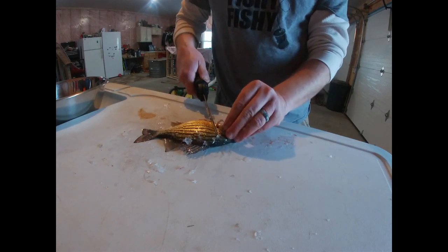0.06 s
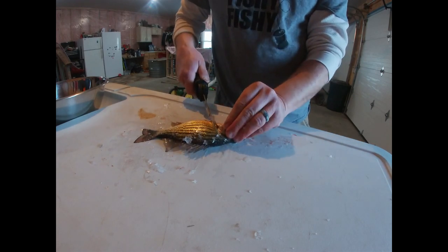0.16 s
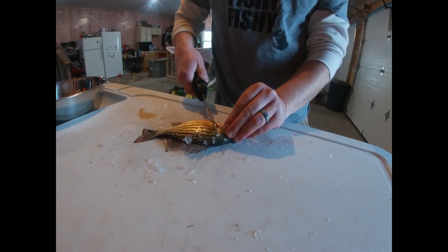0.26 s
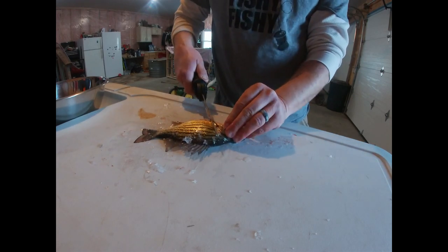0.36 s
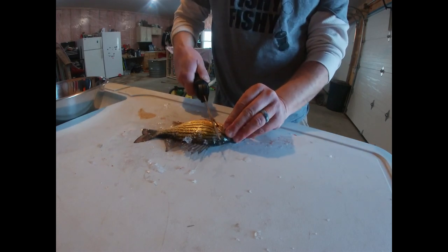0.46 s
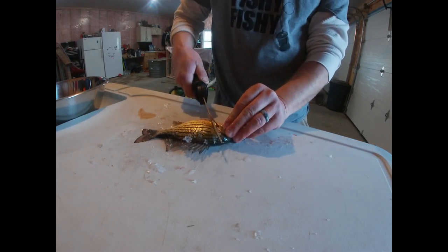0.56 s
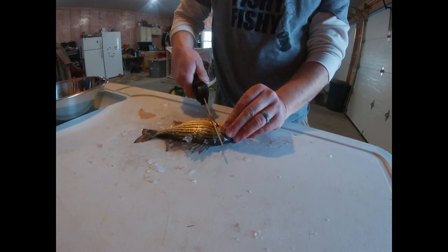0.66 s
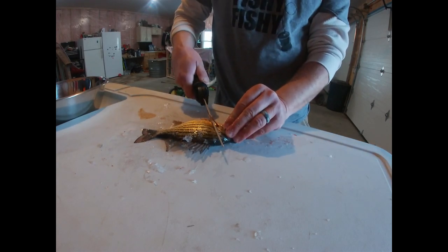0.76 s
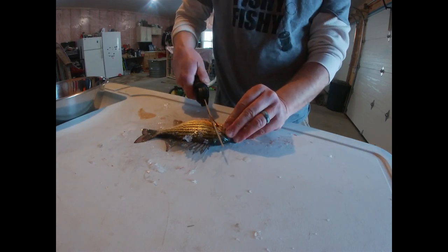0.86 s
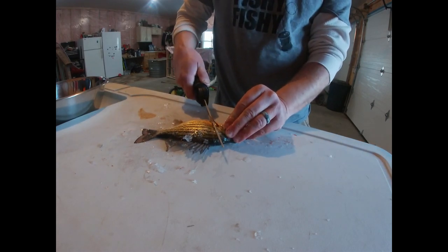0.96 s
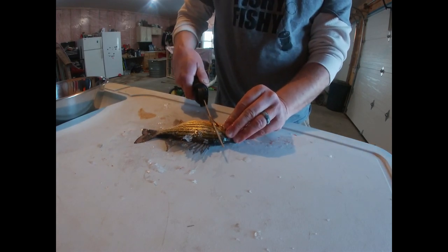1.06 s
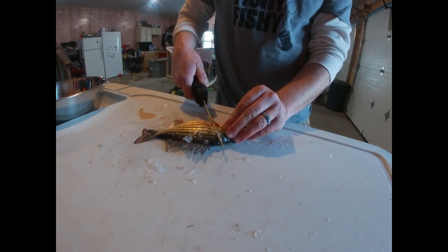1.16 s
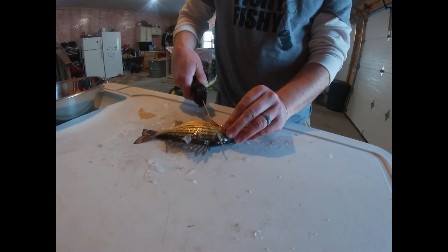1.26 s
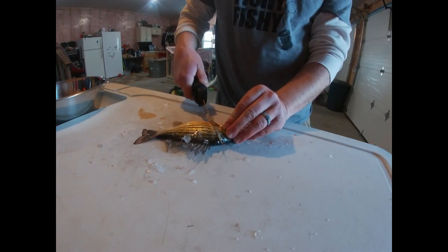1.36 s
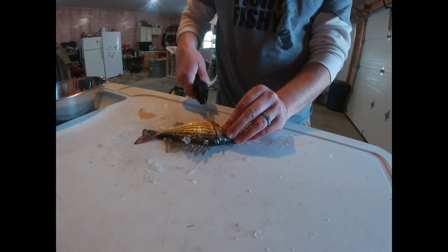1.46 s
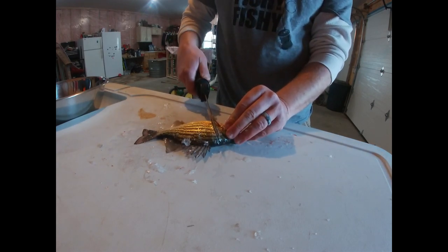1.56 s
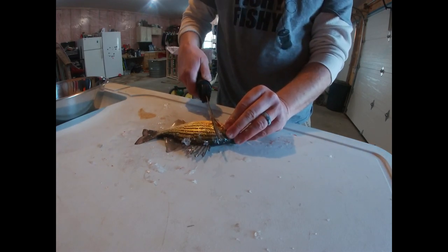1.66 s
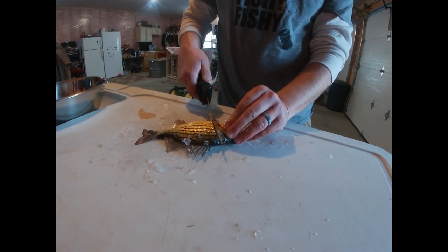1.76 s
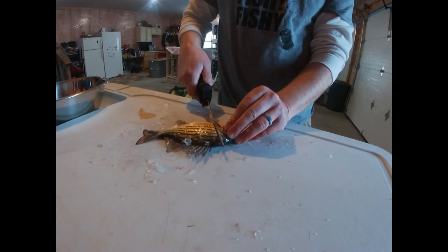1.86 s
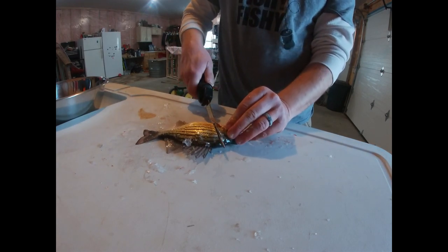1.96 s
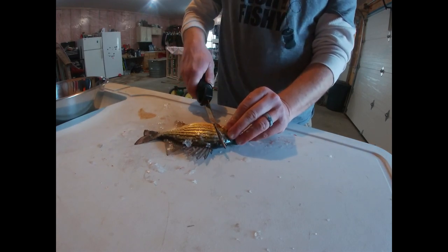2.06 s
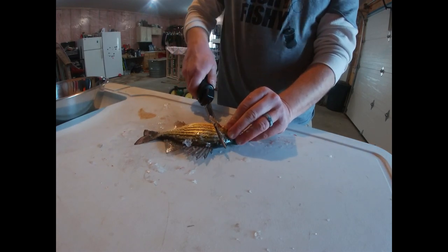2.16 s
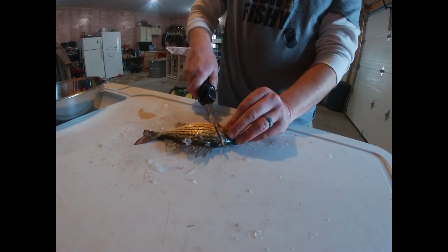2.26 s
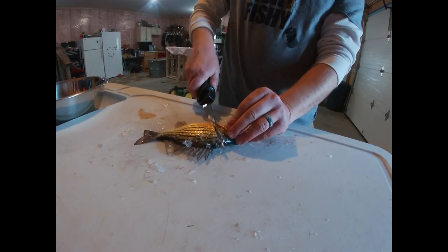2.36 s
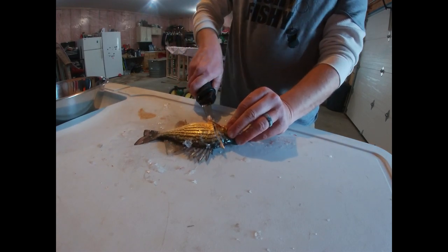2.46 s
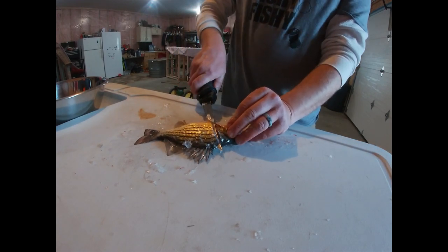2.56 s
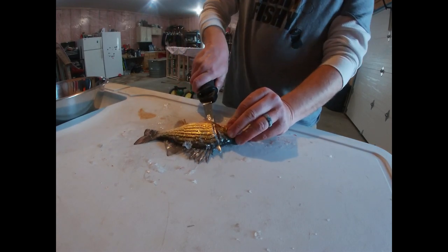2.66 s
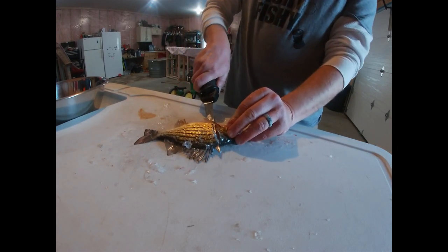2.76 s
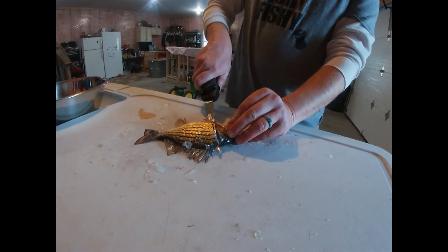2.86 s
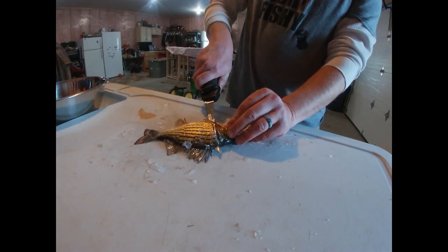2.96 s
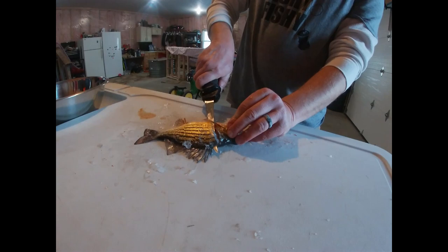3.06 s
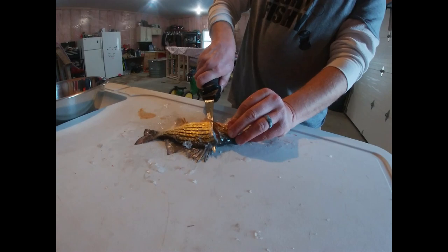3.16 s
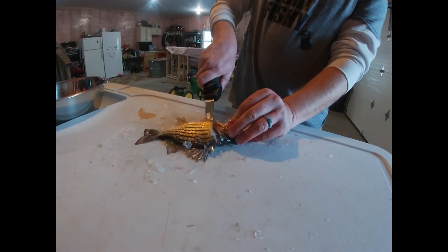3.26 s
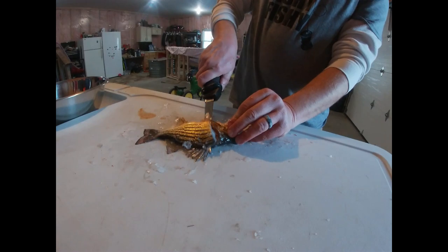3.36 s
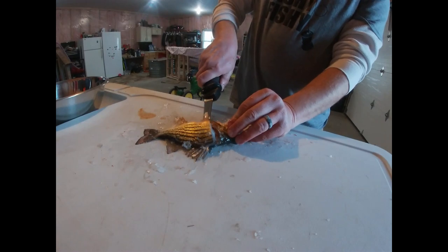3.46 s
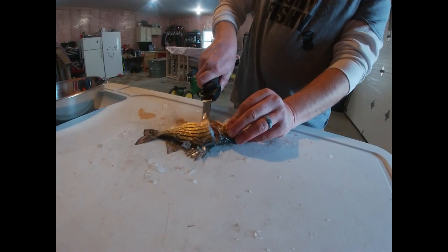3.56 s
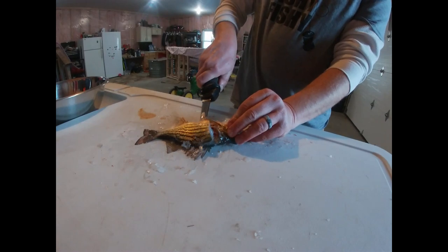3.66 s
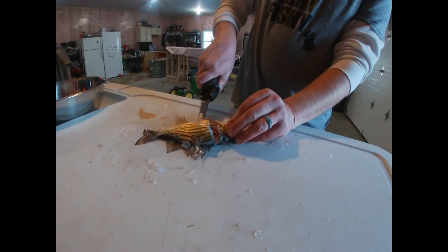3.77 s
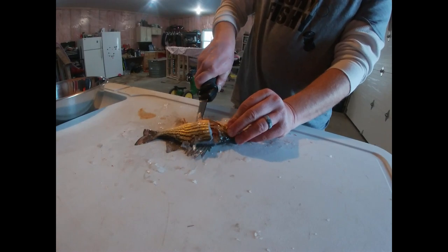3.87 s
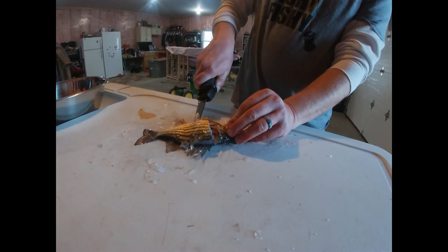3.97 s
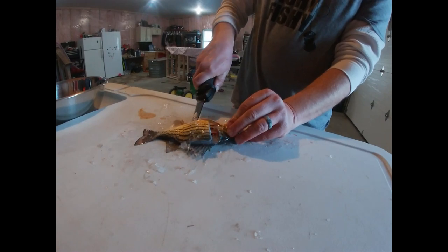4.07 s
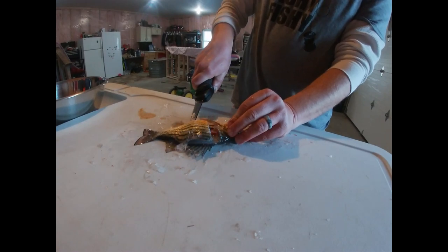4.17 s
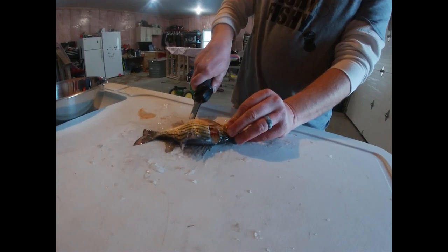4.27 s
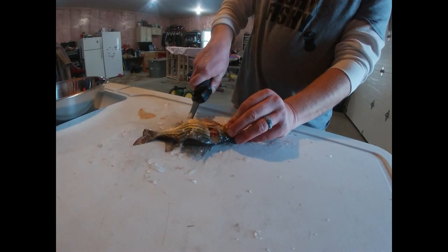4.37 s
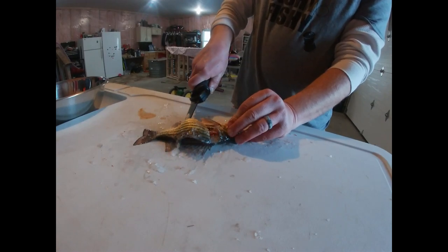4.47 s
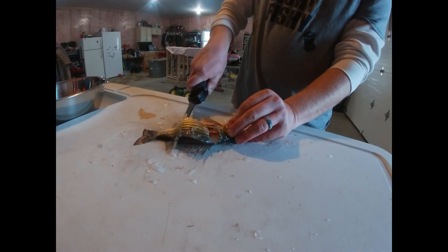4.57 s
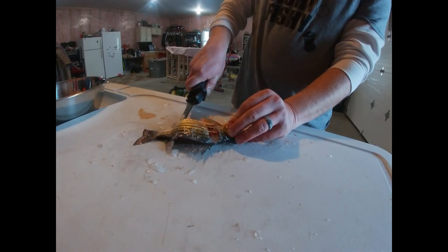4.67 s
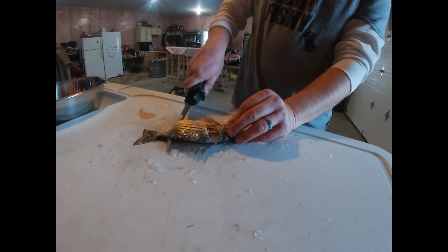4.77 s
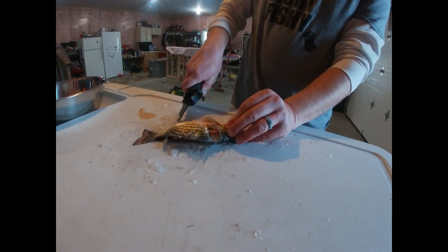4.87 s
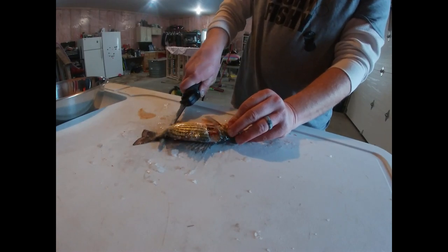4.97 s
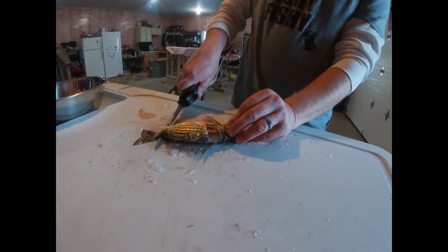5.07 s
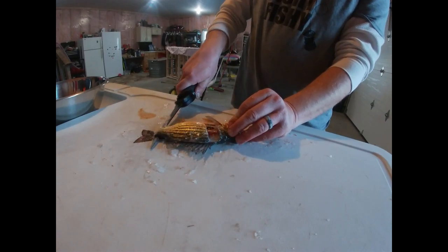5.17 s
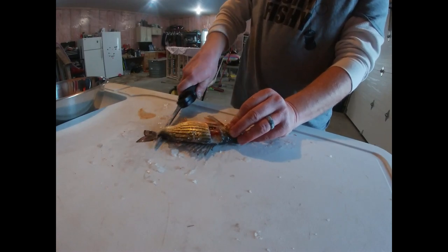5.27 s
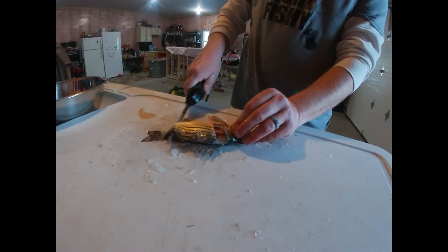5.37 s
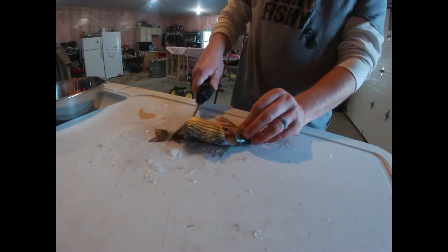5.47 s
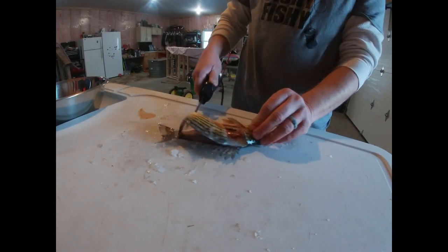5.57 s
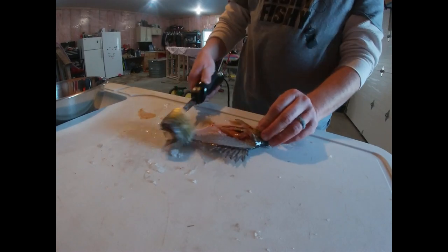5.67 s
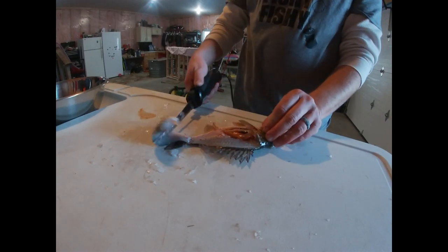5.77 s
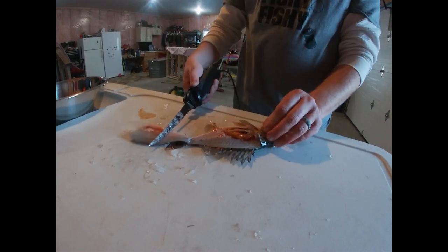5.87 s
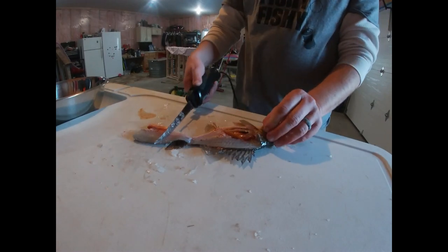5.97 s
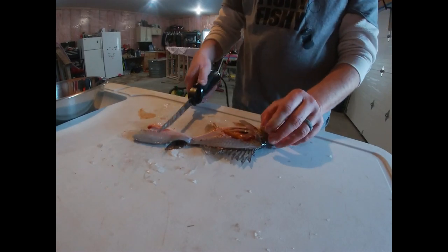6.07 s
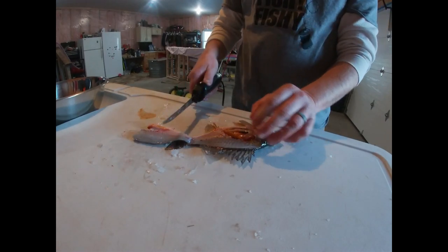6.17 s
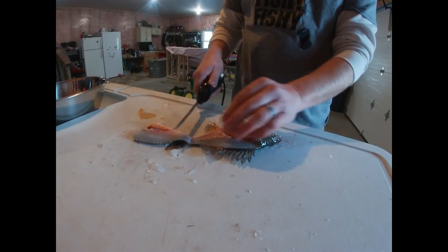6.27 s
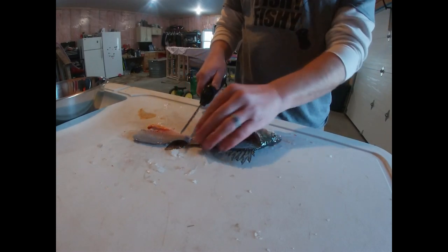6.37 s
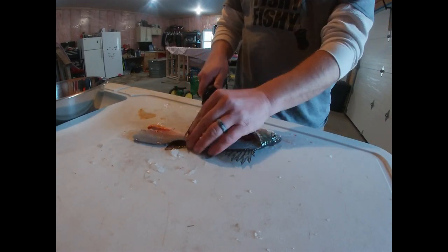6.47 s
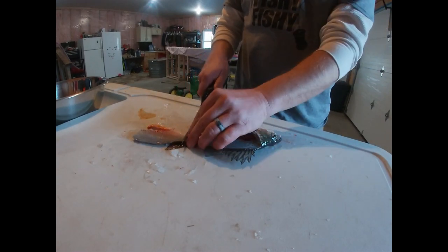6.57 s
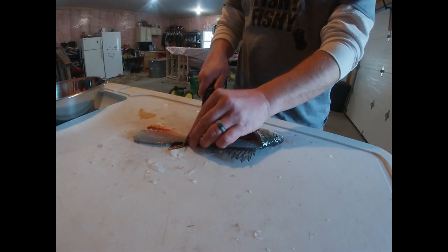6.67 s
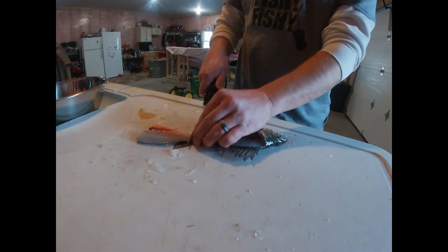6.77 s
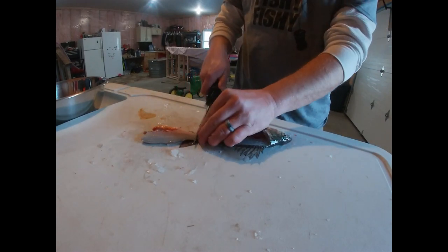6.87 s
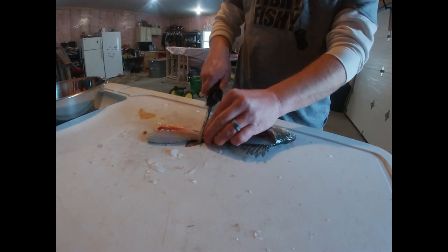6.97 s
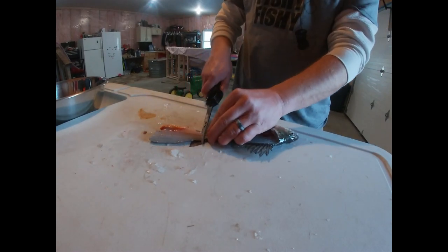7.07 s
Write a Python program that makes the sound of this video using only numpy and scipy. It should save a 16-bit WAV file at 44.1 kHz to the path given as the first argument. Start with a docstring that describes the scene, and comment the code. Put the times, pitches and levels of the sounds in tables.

```python
"""In a garage, with the microphone standing close by on a plastic table, an electric knife fillets a fish.
Over quiet background noise come a cut, a short touch and a long cut: a crank drives the blades to and fro,
they clack at every turn, scrape in between and shake the table top. After each of these three runs
the motor coasts down in single clacks. Then the fillet is flipped over with a crack and a thump, patted and
gripped, and a fourth run begins. Noise bursts make the clacks, multiples of the stroke the table drone."""
import sys
import numpy as np
from scipy import signal
from scipy.fft import rfft, irfft, next_fast_len
from scipy.io import wavfile
from scipy.ndimage import uniform_filter1d, map_coordinates

SR = 44100
rng = np.random.default_rng(int(sys.argv[2]) if len(sys.argv) > 2 else 0)


def unload_audio(sound):
    """Save the sound as a 16-bit wav file, at the path given as the first command line argument."""
    columns = np.transpose(np.atleast_2d(sound))
    # keep every value between -1 and 1, then stretch to whole-number steps
    steps = np.round(np.clip(columns, -1, 1) * 32767)
    wavfile.write(sys.argv[1], SR, steps.astype(np.int16))


N = 313992
TIME = np.arange(N) / SR  # seconds
# All levels in the tables are relative: the gains where the layers are mixed still apply.


def amp(db):
    """Decibels to gain."""
    return 10 ** (np.asarray(db) / 20)


def unit(x):
    """Scale to rms 1."""
    return x / np.sqrt(np.mean(x ** 2) + 1e-20)


def along(points, hz):
    """(Hz, value) points read on a log frequency axis."""
    f, v = np.transpose(points)
    return np.interp(np.log(hz + 1), np.log(f + 1), v)


def wobble(rate):
    """A smooth random curve with rate knots a second."""
    knots = rng.standard_normal(int(N * rate / SR) + 4)
    return map_coordinates(knots, [TIME * rate])


def filtered(x, response):
    """x times a complex response of frequency."""
    m = next_fast_len(N + SR // 2)
    hz = np.fft.rfftfreq(m, 1 / SR)
    return irfft(rfft(x, m) * response(hz), m)[..., :N]


def colour(x, spectrum, size=8192):
    """Causal (minimum-phase) filter of energy 1 with the given spectrum."""
    gain = amp(along(spectrum, np.fft.rfftfreq(size, 1 / SR)))
    cepstrum = irfft(np.log(gain + 1e-6))
    # folding the cepstrum forward in time makes the filter causal
    cepstrum[1:size // 2] *= 2
    cepstrum[size // 2 + 1:] = 0
    response = irfft(np.exp(rfft(cepstrum)))
    return signal.fftconvolve(x, response / np.linalg.norm(response))[:N]


def noise(spectrum):
    """Coloured noise of rms 1."""
    return unit(colour(rng.standard_normal(N), spectrum))


def spikes(times, sizes):
    """Impulses at the given times."""
    samples = np.clip(np.asarray(times) * SR, 0, N).astype(int)
    return np.bincount(samples, sizes, N + 1)[:N]


def bursts(times, sizes, rise, decay):
    """Envelope that jumps at each time and dies away; rise and decay in seconds."""
    t = TIME[:SR // 6]
    shape = np.exp(-t / decay) * (1 - np.exp(-t / rise))
    return np.abs(signal.fftconvolve(spikes(times, sizes), shape / shape.max())[:N])


def held(start, end, fade):
    """Gain that fades in at the start, holds, and fades out by the end."""
    return np.clip(np.minimum(TIME - start, end - TIME) / fade, 0, 1)


def level(curves):
    """Curves of (s, dB) as dB per sample, -100 dB outside them."""
    return np.max([np.interp(TIME, *np.transpose(rows), -100, -100) for rows in curves], axis=0)


# Quiet background noise. Each row: frequency in Hz, level in dB.
BACKGROUND_SPECTRUM = [(15, -24), (25, -11), (55, 1.5), (80, -16), (180, -4), (350, -19), (700, -30.5),
                       (1600, -29), (2300, -33.5), (4500, -34), (7000, -41), (9000, -53), (12000, -53),
                       (16000, -74)]


def background():
    """Steady coloured noise lies under the whole scene."""
    return amp(-54) * noise(BACKGROUND_SPECTRUM)


# Runs of the knife. Each row: trigger pressed in seconds, released in seconds, blades at rest in seconds,
# gear housing in dB, steel blades in dB, jolt of the turns in dB, sway of the table in dB,
# loss of the blades in dB per halving of the speed.
KNIFE_RUNS = [(.221, 1.55, 2.11, -28.5, -26, -21.5, -27.5, 7.5),
              (2.356, 2.542, 2.91, -27.5, -28, -27.5, -31.5, 10),
              (3.133, 5.309, 5.95, -28, -28, -25.5, -33.5, 23),
              (7.002, 7.214, 7.55, -28, -34, -26, -30, 20)]
# Motor speed with the trigger held. Each row: time in seconds, blade turns per second.
HELD_SPEED = [(.55, 74.2), (1.3, 71.6), (2.5, 69.5), (3.45, 71.4), (4.0, 71.0), (4.6, 71.7), (5.05, 71.2),
              (5.28, 72.9)]
START_RATE, REST_RATE = 48, 16  # blade turns per second
SPIN_UP_S = .055  # time constant


def crank():
    """Turns per second and turns made: the motor spins up, holds and coasts down; each run starts on a turn."""
    rate, turns = np.zeros(N), np.zeros(N)
    full = np.interp(TIME, *np.transpose(HELD_SPEED))
    for start, release, rest, *_ in KNIFE_RUNS:
        driven = full - (full - START_RATE) * np.exp(-np.abs(TIME - start) / SPIN_UP_S)
        coasted = np.clip((TIME - release) / (rest - release), 0, 1)
        running = (TIME >= start) & (TIME < rest)
        run = driven * (REST_RATE / full) ** coasted * running
        rate = np.where(run > 0, run, rate)
        turns = np.where(run > 0, np.cumsum(run) / SR, turns)
    return rate, turns


def current_run():
    """The columns of the run last started, for every sample."""
    rows = np.array(KNIFE_RUNS)
    last_started = np.maximum(np.searchsorted(rows[:, 0], TIME) - 1, 0)
    return rows[last_started].T


ATTACK_S, STOP_S = 0.014, 0.039  # the sound builds after the trigger; it dies as the blades come to rest


def effort(rate):
    """Gain that opens while the blades move, and how many times their speed is halved."""
    start, _, rest, *_ = current_run()
    building = 1 - np.exp(-np.maximum(TIME - start, 0) / ATTACK_S)
    moving = building * np.clip((rest - TIME) / STOP_S, 0, 1)
    full = np.interp(TIME, *np.transpose(HELD_SPEED))
    return moving, np.log2(full / np.maximum(rate, REST_RATE))


SINK_S, FREE_HOUSING_DB, FREE_BLADES_DB = 0.68, 5, 2.5  # louder until the knife has sunk into the fish
HOUSING_LOSS_DB = 9.5  # per halving of the speed


def rattle_gains(rate):
    """Housing and blades get quieter as they slow down and as they sink into the fish."""
    start, _, _, housing_db, blades_db, _, _, blades_loss_db = current_run()
    moving, halvings = effort(rate)
    free = np.exp(-np.abs(TIME - start) / SINK_S)
    housing = moving * amp(housing_db + FREE_HOUSING_DB * free - HOUSING_LOSS_DB * halvings)
    blades = moving * amp(blades_db + FREE_BLADES_DB * free - blades_loss_db * halvings)
    return housing, blades


# Spectra of the gear housing, then of the blades in the open, deep in the flesh, and hidden by a hand.
# Each row: frequency in Hz, level in dB.
HOUSING_SPECTRUM = [(260, -34.5), (450, 0.5), (470, -10.5), (637, -2.5), (752, -3.5), (903, -2.5),
                    (968, -2.5), (1120, -4.5), (1550, 0), (1750, -6), (1920, -2.5), (2150, -7),
                    (2390, -0.5), (3600, -6.5), (4680, -42), (7920, -120)]
OPEN_BLADES_SPECTRUM = [(1650, -33), (2800, -4.5), (3580, -1), (3870, -2), (4560, 4), (5310, 0), (6780, -1),
                        (7600, -4), (8230, -10), (9030, -9), (11500, -28.5), (14500, -28.5), (15600, -48)]
DEEP_BLADES_SPECTRUM = [(1650, -11.5), (2800, -5.5), (3210, -0.5), (3790, -4), (4470, 3.5), (5620, 0.5),
                        (6220, -1.5), (7280, -1), (8290, -10.5), (10200, -19), (11200, -30.5), (14300, -30),
                        (15600, -49)]
HIDDEN_BLADES_SPECTRUM = [(1650, -19), (2800, -14), (5350, -12.5), (5620, -19), (7030, -22), (7830, -28),
                          (15600, -47)]


def rattle(rate, turns):
    """Housing and blades clack at each turn, harder one way than the other, and scrape in between."""
    at = np.flatnonzero(np.diff(np.ceil(turns)) > 0)
    chance = rng.standard_normal((len(at), 4))
    times = TIME[at] - .0007 + 0.0004 * chance[:, 0]
    force = np.clip((rate[at] - 42) / 14, 0, 1)  # a slow crank no longer throws the blades at every turn
    one_way = np.cos(np.pi * np.round(turns[at]))  # +1 and -1 by turns
    sizes = force * amp(0.46 * chance[:, 1] + 0.72 * one_way)

    hits = bursts(times, sizes, rise=.0004, decay=.003)
    # steel meets steel
    tick_sizes = sizes * amp(4 * np.minimum(chance[:, 3], 1.5))
    tick = bursts(times + 0.00032, tick_sizes, rise=.0001, decay=0.00031)
    rebound_times = times + 0.0021 + 0.00039 * chance[:, 2]
    rebound = bursts(rebound_times, sizes, rise=0.00025, decay=0.0088)
    scrape = amp(4.44 * wobble(260))

    def grain(tick_share, rebound_share, scrape_share):
        """Noise shaped by the blows, its power evened out over about 56 ms."""
        power = hits ** 2 + (tick_share * tick) ** 2
        power = power + (rebound_share * rebound) ** 2 + (scrape_share * scrape) ** 2
        return rng.standard_normal(N) * np.sqrt(power / np.abs(uniform_filter1d(power, size=2450)))

    housing_gain, blades_gain = rattle_gains(rate)
    housing = colour(housing_gain * grain(.3, .55, .33), HOUSING_SPECTRUM)
    steel = blades_gain * grain(.7, .3, .23)
    deep = np.interp(TIME, [2.2, 3.2], [0, 1])  # flesh closes round the blades
    in_open = (1 - deep) * colour(steel, OPEN_BLADES_SPECTRUM)
    cutting = in_open + deep * colour(steel, DEEP_BLADES_SPECTRUM)
    hidden = colour(steel, HIDDEN_BLADES_SPECTRUM)
    blades = np.where(TIME < KNIFE_RUNS[-1][0], cutting, hidden)  # in the last run a hand hides them
    return amp(-5.0) * housing + amp(-1.9) * blades


# Hardest clacks of the starting or coasting blades; the last row is a crack as the fillet flips over.
# Each row: time in seconds, level in dB.
HARD_CLACKS = [(0.2216, -20), (1.712, -16), (1.751, -18.5), (1.776, -20), (1.8452, -18.5), (1.9127, -17.5),
               (1.9553, -14.5), (2.0018, -17.5), (2.0427, -17.5), (2.127, -27), (2.358, -23.5),
               (2.6955, -21), (2.8102, -18), (2.8376, -21), (2.9048, -26), (3.1342, -22.5), (5.5004, -20.5),
               (5.5423, -19.5), (5.6077, -17.5), (5.689, -19), (5.717, -22.5), (5.7516, -20), (5.8279, -22),
               (5.876, -26), (5.9374, -20.5), (5.974, -25)]
# Spectra of a clack and of its bright edge tick. Each row: frequency in Hz, level in dB.
CLACK_SPECTRUM = [(290, -46), (500, -3.5), (748, -3), (1490, -1.5), (1830, -1), (4590, -0.5), (7930, -9.5),
                  (9030, -14), (10900, -22.5), (14300, -30), (15600, -28)]
EDGE_SPECTRUM = [(4000, -30), (9000, -13), (11500, -3), (14500, 0), (15600, -2)]
SLACK_RATE = 52  # turns per second below which the coasting blades clack singly at each turn
SLACK_DB, SLACK_SCATTER_DB = -20.5, 6  # lesser clacks: level at that rate before the mix, random spread
SLACK_GAP_S = .017  # least distance of a lesser clack from a hard one


def clacks(rate, turns):
    """Starting or coasting, the two blades knock in turn against their slack; the flip's crack is made alike."""
    _, release, *_ = current_run()
    coasting = (rate < SLACK_RATE) & (TIME > release)
    at = np.flatnonzero((np.diff(np.ceil(turns)) > 0) & coasting[1:])
    hard_s, hard_db = np.transpose(HARD_CLACKS)
    lesser = at[np.abs(TIME[at, None] - hard_s).min(axis=1) > SLACK_GAP_S]
    lesser_db = SLACK_DB + 20 * np.log10(rate[lesser] / SLACK_RATE)  # in proportion to the speed
    lesser_db = lesser_db + SLACK_SCATTER_DB * rng.standard_normal(len(lesser))

    first = np.r_[hard_s, TIME[lesser]]
    sizes = amp(np.r_[hard_db, lesser_db])
    second = first + 0.0018 + 0.0019 * rng.random(len(first))
    shape = bursts(first, sizes, rise=0.0001, decay=0.00097)
    shape = shape + .5 * bursts(second, sizes, rise=0.00029, decay=.0022)
    body = colour(rng.standard_normal(N) * shape, CLACK_SPECTRUM)
    edge_shape = bursts(first, sizes, rise=.0001, decay=.0004)
    edges = colour(rng.standard_normal(N) * edge_shape, EDGE_SPECTRUM)
    return amp(-7.5) * body + amp(-27.5) * edges


# Ringing of the blades. Each row: frequency in Hz, width in Hz, level in dB.
STEEL_MODES = [(990, 15, -5), (1203, 26, -14), (1590, 130, -10), (2920, 40, -4.5), (5630, 13, 3.5),
               (6620, 13, -5), (6980, 24, 1)]


def ringing(x):
    """The steel adds narrow resonances to all that strikes it."""
    def response(f):
        return 1 + sum(amp(db) * 1j * f * width / (centre * centre - f * f + 1j * f * width)
                       for centre, width, db in STEEL_MODES)

    return filtered(x, response)


# How hard the blades are pressed into the flesh, one curve per run. Each row: time in seconds, drag in dB.
PRESSURE_CURVES = [
    [(0.24, -32), (0.254, -29.5), (0.82, -34.5), (0.85, -24), (1.166, -26.5), (1.332, -19), (1.488, -30),
     (1.514, -18.5), (1.68, -48), (1.944, -46), (1.974, -27.5), (2.1, -34)],
    [(2.37, -27), (2.43, -19), (2.7, -30.5), (2.738, -22.5), (2.84, -27), (2.91, -34)],
    [(3.15, -33), (3.19, -19), (3.26, -31), (3.31, -17), (3.54, -19), (3.59, -28.5), (3.67, -19),
     (3.9, -28.5), (3.97, -18.5), (4.11, -30.5), (4.14, -22), (4.45, -24), (4.48, -20), (4.51, -24.5),
     (4.68, -21.5), (4.73, -32), (4.86, -20), (5.17, -26.5), (5.2, -18.5), (5.26, -42), (5.41, -32),
     (5.48, -48)],
    [(7.01, -24), (7.05, -23), (7.12, -30)],
]
# Contact of the blades with the bones, one curve per run. Each row: time in seconds, chatter in dB.
BONE_CURVES = [
    [(0.24, -41), (0.27, -36), (1.128, -38), (1.434, -29), (1.714, -57.5), (2.092, -39.5), (2.13, -53)],
    [(2.37, -29), (2.424, -30.5), (2.92, -46.5)],
    [(3.15, -38.5), (3.29, -25), (3.6, -32.5), (4.34, -35), (5.18, -23.5), (5.26, -33), (5.3, -23),
     (5.45, -54.5), (5.93, -42.5)],
    [(7.01, -24), (7.04, -28.5), (7.12, -19)],
]
# A hand leans on the table and keeps it swaying between cuts: from in seconds, to in seconds, level in dB.
HAND_LEAN = (1.4, 3.2, -42.5)
USUAL_PRESSURE_DB, SWAY_FOLLOWS, SWAY_RANGE_DB = -21, 0.41, 51  # sway follows in dB per dB, down to a limit
USUAL_BONE_DB, JOLT_FOLLOWS = -34.5, 0.66  # jolts follow bone contact in dB per dB
JOLT_LOSS_DB, SWAY_LOSS_DB = 6, 0.5  # per halving of the speed
GRIP_FADE_S = .025  # a hand comes and goes


def table_gains(rate):
    """Pressure sets the drag and feeds the sway; the bones add chatter and harden the jolts."""
    *_, jolt_db, sway_db, _ = current_run()
    moving, halvings = effort(rate)
    pressure_db, bone_db = level(PRESSURE_CURVES), level(BONE_CURVES)
    extra_pressure_db = np.maximum(pressure_db - USUAL_PRESSURE_DB, -SWAY_RANGE_DB)
    sway = amp(sway_db + SWAY_FOLLOWS * extra_pressure_db - SWAY_LOSS_DB * halvings)
    jolt = amp(jolt_db + JOLT_FOLLOWS * (bone_db - USUAL_BONE_DB) - JOLT_LOSS_DB * halvings)
    lean_from, lean_to, lean_db = HAND_LEAN
    leaning = amp(lean_db) * held(lean_from, lean_to, GRIP_FADE_S)
    return np.hypot(moving * sway, leaning), moving * amp(pressure_db), moving * jolt, moving * amp(bone_db)


def hum(rate, turns, orders, spectrum, waver_db, rough):
    """Multiples of the stroke (two turns) through the table, with uneven grip as noise."""
    tone, power = np.zeros(N), np.full(N, 1e-4)
    for k in orders:
        gain = amp(along(spectrum, k * rate / 2))
        phase = np.pi * k * turns + 0.2 * wobble(12) + 2 * np.pi * rng.random()
        tone += gain * amp(waver_db * wobble(15)) * np.sin(phase)
        power += gain ** 2 / 2
    # slow blades give more noise and less tone
    rough = np.clip(rough + 0.64 * np.clip((62 - rate) / 25, 0, 1), 0, 1)
    return np.sqrt(1 - rough) * tone / np.sqrt(power) + np.sqrt(rough) * noise(spectrum)


# Spectra of the table's sway, the drag of the flesh, the jolts of the turns and the chatter of the bones.
# Each row: frequency in Hz, level in dB.
SWAY_SPECTRUM = [(18, -49), (35, -2.5), (46, 8.5), (58, 9), (73, -1), (90, 7), (130, -90), (400, -120)]
DRAG_SPECTRUM = [(60, -60), (85, -2), (107, 4.5), (135, -5), (180, -4), (250, -16.5), (400, -56.5),
                 (1000, -120)]
JOLT_SPECTRUM = [(80, -63.5), (125, -11), (146, 2), (180, -4.5), (215, -1.5), (255, -18), (400, -46),
                 (1000, -120)]
CHATTER_SPECTRUM = [(215, -32.5), (250, -1.5), (286, 3.5), (320, -8.5), (355, -2.5), (430, -9.5),
                    (560, -12.5), (900, -29), (3000, -120)]


def table_drone(rate, turns):
    """Drag reverses with each stroke (odd multiples); the jolts at the turns do not (even multiples)."""
    sway, drag, jolt, chatter = table_gains(rate)
    swaying = hum(rate, turns, [1, 2], SWAY_SPECTRUM, waver_db=2.5, rough=.6)
    dragging = hum(rate, turns, [3, 5, 7, 9], DRAG_SPECTRUM, waver_db=1.5, rough=.15)
    jolting = hum(rate, turns, [4, 6, 8, 10], JOLT_SPECTRUM, waver_db=2, rough=.25)
    chattering = hum(rate, turns, np.arange(7, 19), CHATTER_SPECTRUM, waver_db=3.5, rough=0.45)
    low = sway * swaying + amp(0.8) * drag * dragging
    return low + amp(-4.5) * jolt * jolting + amp(-1.35) * chatter * chattering


# Reverberation of the garage. Each row: frequency in Hz, time to fall by 60 dB in seconds.
GARAGE_DECAY = [(100, 0.75), (500, 0.6), (2500, 0.47), (5500, 0.52), (8000, 0.47), (12000, 0.18)]


def garage(x):
    """Each frequency of the room's answer dies at its own speed."""
    hz, t, z = signal.stft(rng.standard_normal(SR), SR, nperseg=256)
    fall_db = -60 * t / along(GARAGE_DECAY, hz)[:, None]
    tail = signal.istft(z * amp(fall_db), SR, nperseg=256)[1]
    tail = tail * (1 - np.exp(-np.arange(len(tail)) / SR / 0.0027))  # builds up over a few ms
    return signal.fftconvolve(x, tail / np.linalg.norm(tail))[:N]


# Knocks on the table. Each row: time in seconds, level in dB.
TABLE_KNOCKS = [(2.933, -24), (3.069, -35), (5.974, -5.5), (5.995, -14), (6.507, -29), (6.743, -58)]
# Ringing of the table top. Each row: frequency in Hz, level in dB, time to fall by 60 dB in seconds.
TABLE_MODES = [(62.3, -9, 0.93), (109, -14, 0.28), (112, 10, 0.22), (171.8, 6, 0.48), (203.5, 2.5, 0.29),
               (280, -20.5, 0.43), (348.7, -1.5, 0.17), (405, -17.5, 0.13), (625, -13, 0.084)]
# Dull shudder of the table frame. Each row: frequency in Hz, level in dB.
THUD_SPECTRUM = [(100, -26), (280, 6.5), (450, -6.5), (700, -14.5), (1200, -28), (3000, -49), (9000, -120)]


def knocks():
    """Soft blows ring the table top, and its frame shudders briefly."""
    s, db = np.transpose(TABLE_KNOCKS)
    t = TIME[:SR // 2]
    ring = np.zeros(len(t))
    for k, (hz, mode_db, t60) in enumerate(TABLE_MODES):
        ring += (-1) ** k * amp(mode_db - 60 * t / t60) * np.sin(2 * np.pi * hz * t)
    top = signal.fftconvolve(spikes(s, amp(db)), ring / np.abs(ring).max())[:N]
    shudder = bursts(s, amp(db), rise=0.00063, decay=0.027)
    thud = colour(rng.standard_normal(N) * shudder, THUD_SPECTRUM)
    return amp(-5.5) * top + amp(-17.0) * thud


# Hollows opened by the cut. Each row: opens in seconds, closes in seconds, first frequency in Hz,
# rise in octaves per second, resonance in dB.
CUT_HOLLOWS = [(3.172, 4.643, 933, 1.52, 8.5), (4.857, 5.49, 976, .45, 9)]
SMALLEST_HOLLOW_HZ, HOLLOW_FADE_S, HOLLOW_LIFE_S = 2352, 0.16, 2  # top frequency, fade, decay constant
# the wet flap opens and closes the hollow: share of its depth, random knots per second
HOLLOW_FLICKER, FLICKER_RATE = 0.38, 16


def pocket(x, octaves=0.13):
    """The hollow under the fillet resonates, rising as the cut goes on; a new one opens at the tail end."""
    hz, t, z = signal.stft(x, SR, nperseg=512)
    for opens, closes, first_hz, rise, db in CUT_HOLLOWS:
        centre = np.minimum(first_hz * 2 ** (rise * (t - opens)), SMALLEST_HOLLOW_HZ)
        bell = np.exp(-.5 * (np.log2((hz[:, None] + 1) / centre) / octaves) ** 2)
        depth = held(opens, closes, HOLLOW_FADE_S) * np.exp(-np.abs(TIME - opens) / HOLLOW_LIFE_S)
        depth = depth * np.clip(1 + HOLLOW_FLICKER * wobble(FLICKER_RATE), 0, 1.4)
        # away from the resonance the sound is slightly lowered
        z = z * amp(db * np.interp(t, TIME, depth) * (bell - 0.17))
    return signal.istft(z, SR, nperseg=512)[1][:N]


# Wet slaps and taps of fish and fingers. Each row: time in seconds, level in dB.
WET_SLAPS = [(5.9718, -25.5), (6.231, -31.5), (6.363, -47.5), (6.4936, -32.5), (6.505, -33), (6.689, -41),
             (6.7094, -53), (6.837, -50.5)]
# Spectrum of wet skin. Each row: frequency in Hz, level in dB.
SLAP_SPECTRUM = [(350, -30), (600, -14), (655, -9), (885, -10), (991, -13), (1540, -1.5), (2130, -8),
                 (3560, -6.5), (4810, -15), (7000, -31), (9940, -35), (12000, -46), (15600, -88),
                 (22000, -120)]


def slaps():
    """Wet skin smacks on plastic: a short click, then a squelch."""
    s, db = np.transpose(WET_SLAPS)
    squelch_shape = bursts(s, amp(db), rise=0.0009, decay=0.016)
    squelch = colour(rng.standard_normal(N) * squelch_shape, SLAP_SPECTRUM)
    click_shape = bursts(s, amp(db), rise=.0002, decay=0.0012)
    click = colour(rng.standard_normal(N) * click_shape, CLACK_SPECTRUM)
    return amp(-10.5) * squelch + amp(-17) * click


# The hand rests on the fillet. Each row: from in seconds, to in seconds, table rubbing in dB,
# skin sliding in dB.
HAND_GRIPS = [(6.247, 6.417, -59, -61), (6.5, 7.038, -42, -55)]


def handling():
    """Fingers lean on the table and slide over the fillet in small sticky slips."""
    rub, skin = np.zeros(N), np.zeros(N)
    for start, end, rub_db, skin_db in HAND_GRIPS:
        grip = held(start, end, GRIP_FADE_S)
        rub += amp(rub_db) * grip
        skin += amp(skin_db) * grip
    lean = noise([(25, -19), (55, 2), (85, -11), (150, -2.5), (200, -7.0), (300, -14.5), (500, -18.0),
                  (1200, -34.0), (6000, -120)])
    slips = unit(amp(3.6 * wobble(60) + 3.4 * wobble(400)) * noise(SLAP_SPECTRUM))
    return amp(-5) * rub * lean + amp(-4.5) * skin * slips


def scene():
    """Knife, table and hands in the room, heard alike in both channels."""
    rate, turns = crank()
    knife = pocket(ringing(rattle(rate, turns) + clacks(rate, turns)))
    table = table_drone(rate, turns) + knocks()
    wet = slaps()
    room = garage(amp(-11.5) * knife + amp(-16.0) * table + amp(-10.0) * wet)
    mono = knife + table + wet + handling() + room + background()
    return np.array([mono, mono])


TOP_HZ = 15780


def record(dry):
    """The sound has nothing above TOP_HZ."""
    return filtered(dry, lambda hz: hz < TOP_HZ)


dry = scene()
out = record(dry)
unload_audio(out)
```